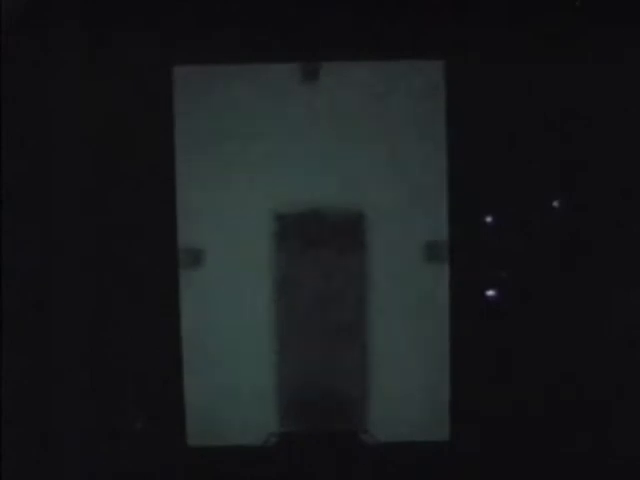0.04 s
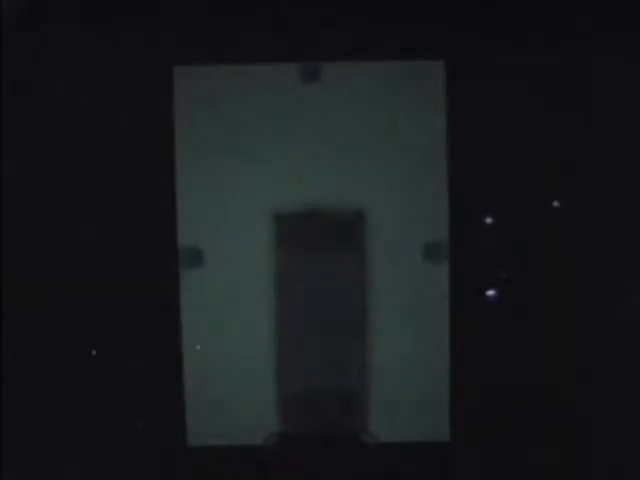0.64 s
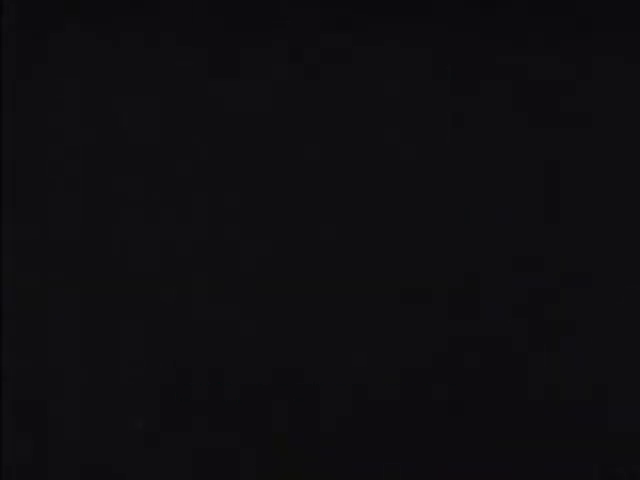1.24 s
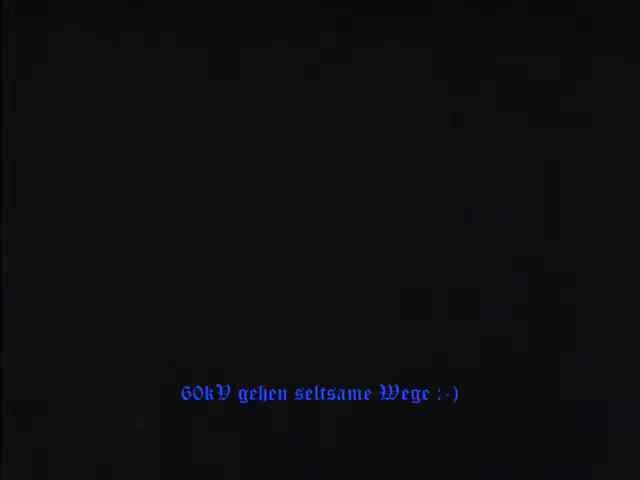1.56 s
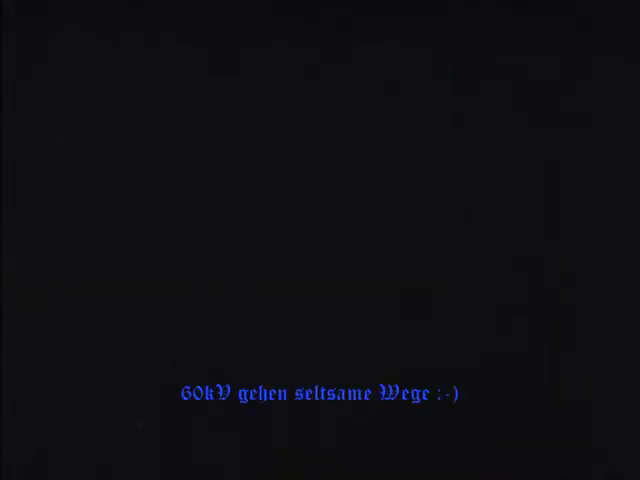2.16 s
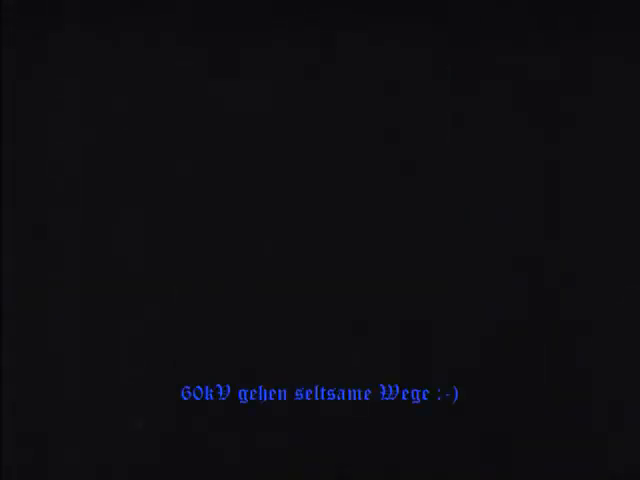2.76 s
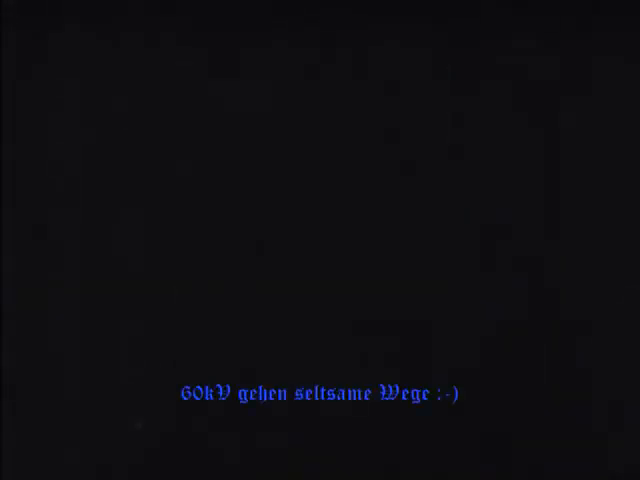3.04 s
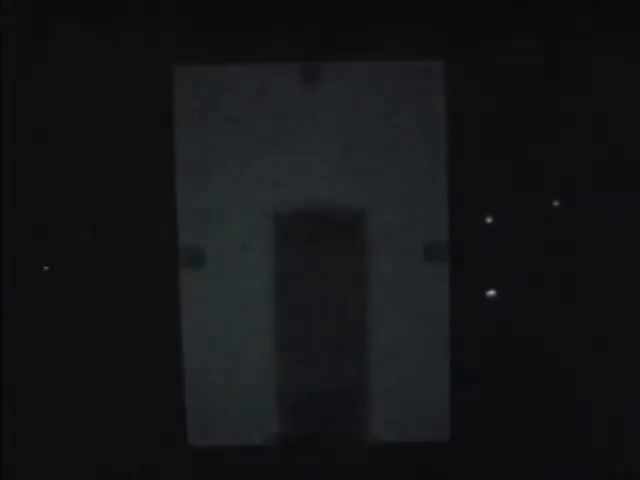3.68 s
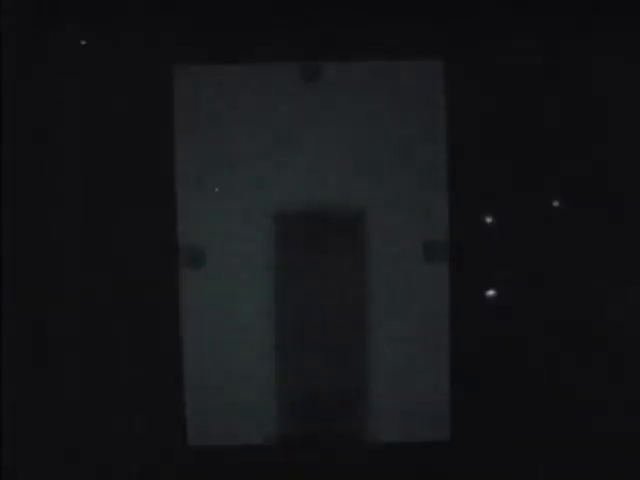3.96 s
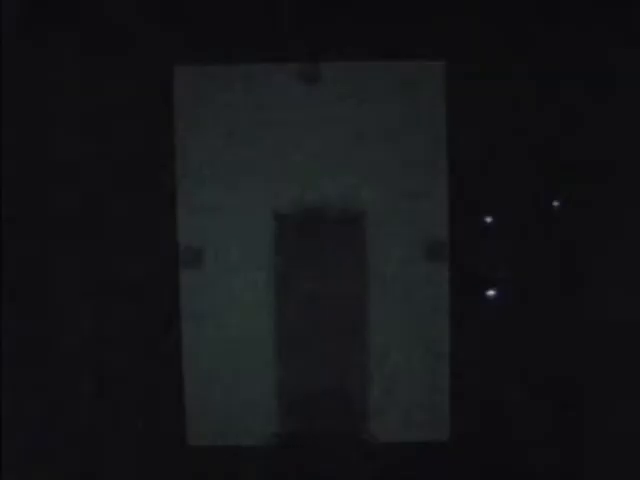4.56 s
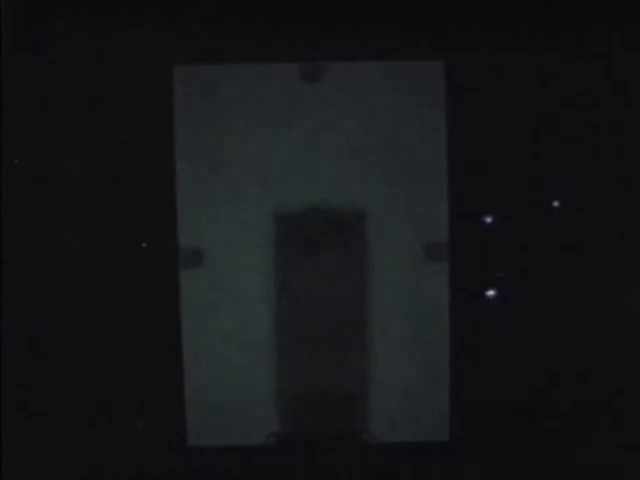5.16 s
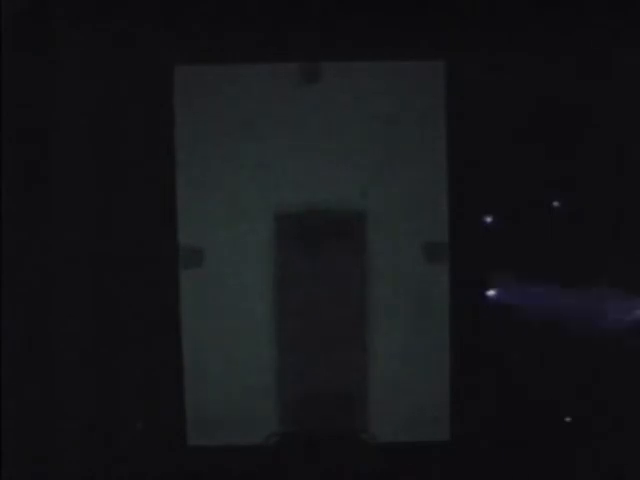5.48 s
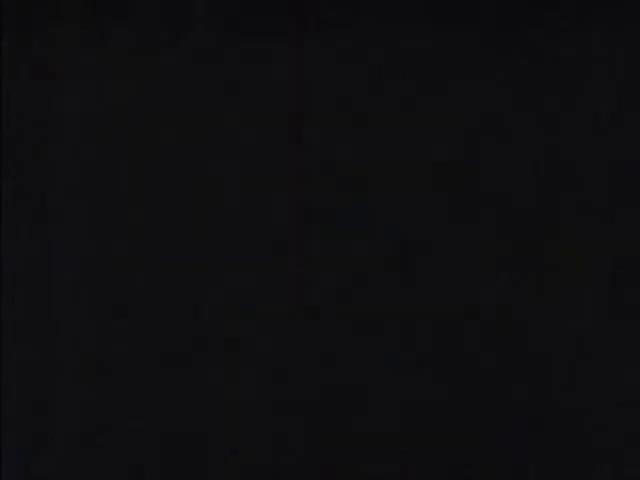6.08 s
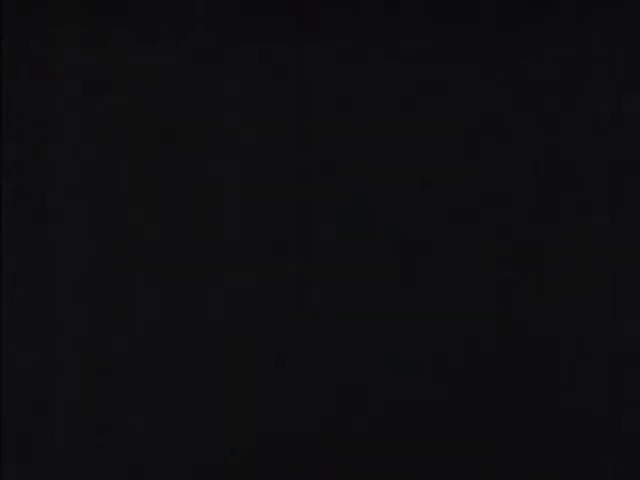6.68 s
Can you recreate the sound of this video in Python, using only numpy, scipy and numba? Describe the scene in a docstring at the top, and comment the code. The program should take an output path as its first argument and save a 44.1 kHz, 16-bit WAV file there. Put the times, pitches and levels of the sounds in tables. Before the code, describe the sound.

A frying electrical hiss and little spark snaps lead to a sharp discharge in a laboratory, over the throbbing hum and rapid ticking of vacuum pumps. The hiss dies away, leaving the machinery and a few faint squeaks. Then it resumes, with more sparks and two hard cracks that ring briefly in the room. Each big crack overloads the mono microphone and briefly pushes the background down.

```python
"""Corona hisses and small sparks snap at a high-voltage rig in a lab, over running vacuum pumps.
The pumps drone, clatter and rattle in a slow beat: shaft, strokes, housing and a ticking valve.
Three full flashovers crack and ring through the room, one early and two near the end.
A camcorder's mono microphone hears it all; its gain control ducks at each crack and creeps back up."""
import sys
import numpy as np
from scipy import signal
from scipy.fft import rfft, irfft
from scipy.io import wavfile
from scipy.ndimage import uniform_filter1d
from numba import njit

SR = 44100
rng = np.random.default_rng(int(sys.argv[2]) if len(sys.argv) > 2 else 0)


def log_audio(samples):
    """Write samples as a 16-bit WAV file to the path given in sys.argv[1]."""
    # one column per channel
    frames = np.atleast_2d(samples).T
    # limit to full scale, then quantise
    limited = np.clip(frames, -1, 1)
    pcm = np.round(limited * 32767).astype(np.int16)
    wavfile.write(sys.argv[1], SR, pcm)


N = 305172
T = np.arange(N) / SR
STROKE_HZ, BEAT_HZ = 50.3, 2.5  # the pumps' strokes and their slow beat
DRONE_PEAK_S, RATTLE_PEAK_S = 2.8394, 2.675


def undb(db):
    """Decibels to gain."""
    return 10 ** (np.asarray(db) / 20)


def level(x, db):
    """Scale to an rms level."""
    return x * undb(db) / np.sqrt(np.mean(x ** 2))


def colour(x, points, size=4096):
    """Minimum-phase filter through points of frequency_hz, gain_db."""
    hz, db = np.transpose(points)
    bins = np.maximum(np.fft.rfftfreq(size, 1 / SR), 1)
    gain = undb(np.interp(np.log(bins), np.log(hz), db))
    cepstrum = irfft(np.log(gain))
    cepstrum[1:size // 2] *= 2
    cepstrum[size // 2 + 1:] = 0
    return signal.fftconvolve(x, irfft(np.exp(rfft(cepstrum))))[:N]


def band(x, lo_hz, hi_hz, order=2):
    """Band-pass between two edges."""
    return signal.sosfilt(signal.butter(order, [lo_hz, hi_hz], "bandpass", fs=SR, output="sos"), x)


@njit
def sweep(x, hz, width):
    """One resonance whose centre moves, gain 1 at the centre."""
    out, band_state, low_state = np.empty(len(x)), 0., 0.
    for i in range(len(x)):
        tuning, damping = np.tan(np.pi * hz[i] / SR), width / hz[i]
        passed = (band_state + tuning * (x[i] - low_state)) / (1 + tuning * (tuning + damping))
        band_state = 2 * passed - band_state
        low_state += 2 * tuning * passed
        out[i] = damping * passed
    return out


def noise(repeat_hz=None):
    """White noise, fresh or coming round again at a rate."""
    x = rng.standard_normal(N)
    return x if repeat_hz is None else x[np.round(T % (1 / repeat_hz) * SR).astype(int)]


def ringing(hz, width_hz, db):
    """A steady ring: noise passed twice through one resonance, at an rms level."""
    peak = signal.iirpeak(hz, hz / width_hz, SR)
    return level(signal.lfilter(*peak, signal.lfilter(*peak, noise())), db)


def walk(rate_hz):
    """Smooth random drift with a spread near 1."""
    step = int(SR / rate_hz)
    held = np.repeat(rng.standard_normal(N // step + 1), step)
    return level(uniform_filter1d(uniform_filter1d(held, step), step)[:N], 0)


def fade(start, t60):
    """Envelope that jumps to 1 and dies away."""
    return (T >= start) * np.exp(-np.log(1000) * np.clip((T - start) / t60, 0, 10))


def beat(peak_s):
    """The pumps' slow beat, swinging between -1 and 1."""
    return np.cos(2 * np.pi * BEAT_HZ * (T - peak_s))


def knocks(per_s, sharpness):
    """Gate that jumps open at each knock and falls away until the next."""
    return np.exp(-sharpness * (T * per_s % 1))


def lab_air():
    """Room tone: the steady air of the lab around the microphone."""
    # colour of the air: frequency_hz, gain_db
    air = [(20, -39), (70, -47), (150, -32), (300, -25), (500, -13), (950, -16), (1800, -19), (2400, -20),
           (5200, -30), (8000, -32.5), (14500, -48.5)]
    return level(colour(noise(), air), db=-45.5)


def squeaks(flutter=0.36, flutter_hz=24.36, width_hz=150):
    """A dry spot in the pump sings briefly, pulsing as the shaft turns."""
    # faint squeaks: peak_s, pitch_hz, half_length_s, level_db
    chirps = [(1.68, 5180, .08, -54), (2.09, 5170, .05, -55.5), (2.105, 6170, 0.0085, -54),
              (2.422, 10200, .03, -64), (2.45, 5210, 0.097, -57), (3.305, 6180, 0.0085, -51),
              (3.405, 5240, 0.026, -47), (6.85, 5250, .05, -56)]
    song = sum(ringing(hz, width_hz, db) * np.exp(-((T - peak_s) / half_s) ** 2)
               for peak_s, hz, half_s, db in chirps)
    return song * (1 + flutter * np.cos(2 * np.pi * flutter_hz * (T - DRONE_PEAK_S)))


def drone(gain_db=2.4, waver_db=0.16):
    """Neighbouring shaft tones flutter against each other and swell twice a beat."""
    # throbbing tones, spaced by the shaft rate: pitch_hz, relative_db
    shaft_tones = [(400.1, -44), (424.46, -45)]
    # steady tones beside them: pitch_hz, relative_db
    side_tones = [(390.1, -58), (438.84, -58), (448.85, -52), (453.86, -57)]
    # two rows for the long swell, two for the short: peak_s, half_length_s, relative_db
    throbs = [(2.779, 0.043, -4.5), (2.871, 0.059, -0.5), (3.014, 0.041, 0), (3.076, 0.026, -6)]

    def tones(table, lead_s=0):
        return sum(undb(db) * np.cos(2 * np.pi * hz * (T + lead_s - DRONE_PEAK_S)) for hz, db in table)

    swells = []
    for peak_s, half_s, db in throbs:
        from_peak_s = (((T - peak_s) * BEAT_HZ + .5) % 1 - .5) / BEAT_HZ
        swells.append(undb(db) * np.exp(-(from_peak_s / half_s) ** 2))
    long_throb = sum(swells[:2]) * tones(shaft_tones)
    short_throb = sum(swells[2:]) * tones(shaft_tones, lead_s=.00145)
    return (2 * (long_throb + short_throb) + tones(side_tones)) * undb(gain_db + waver_db * walk(9))


def chamber(opens_s=2.555, start_hz=1830, end_hz=815, sink_s=.14):
    """The pump chamber opens once a beat; its resonance sinks as it grows. Gives Hz and opening (0-1)."""
    age = (T - opens_s) % (1 / BEAT_HZ)
    hz = end_hz + (start_hz - end_hz) * np.exp(-age / sink_s)
    return hz, np.sin(np.pi * (age * BEAT_HZ) ** 0.54)


def hum(waver_db=3.0, drift_cycles=0.16, rest=0.68, reach_hz=170):
    """Mains hum, ringing metal, and a whine whose tones flare as the chamber's resonance passes."""
    # mains and motor hum: pitch_hz, level_db
    mains = [(75.4, -77), (100, -68), (150.5, -74.5), (199.5, -68.5), (247.6, -65), (300.5, -62.5)]
    # whine of the pump strokes: pitch_hz, level_db
    whine = [(522, -57), (655, -52.5), (754, -55), (855, -54), (954, -51), (1005, -51), (1106, -54),
             (1156, -50), (1408, -56), (1500, -49.5), (1612, -53), (1693, -58), (1756, -55)]
    # narrow rings of the pump's metal parts: pitch_hz, width_hz, level_db
    metal_rings = [(749, 29, -57), (872, 76, -50.5), (962.6, 80, -50), (1337, 55, -51.5), (1513, 49, -58),
                   (1837, 40, -52), (4186, 220, -58.5), (5210, 90, -66), (8950, 36, -77)]
    out = sum(level(np.sin(2 * np.pi * (hz * T + rng.random())), db) for hz, db in mains)
    chamber_hz, opening = chamber()
    for hz, db in whine:
        flare = opening / (1 + ((hz - chamber_hz) / reach_hz) ** 2)
        strength = (rest + flare) * undb(waver_db * walk(12))
        out += level(strength * np.sin(2 * np.pi * (hz * T + drift_cycles * walk(11))), db)
    return out + sum(ringing(hz, width, db) for hz, width, db in metal_rings)


def turning(wobble_rad=0.71):
    """Broadband pattern that comes round with each shaft turn (two strokes) and slowly changes shape."""
    size = int(2 * SR / STROKE_HZ)
    place = (T * STROKE_HZ / 2 % 1 * size).astype(int)
    spectra = (np.exp(2j * np.pi * rng.random(size // 2 + 1)) for _ in range(2))
    first, second = (level(irfft(spectrum, size), 0)[place] for spectrum in spectra)
    angle = wobble_rad * walk(8)
    return first * np.cos(angle) + second * np.sin(angle)


def clatter(body_db=-39.5, swell_db=1.1, churn_db=-44, churn_width_hz=640., wander=.03):
    """Two and three knocks a stroke shake the housing and churn in the chamber, repeating as a buzz."""
    # colour of the pump housing: frequency_hz, gain_db
    housing = [(120, -47), (200, -30.5), (280, -19.5), (370, -10.5), (460, -6), (550, -9), (660, -6.5),
               (800, -8.5), (960, -2), (1190, -11.5), (1450, -7.5), (1680, -14), (1850, -16), (2400, -34)]
    top_hz = 1875
    gate = knocks(3 * STROKE_HZ, sharpness=1.8) + .8 * knocks(2 * STROKE_HZ, sharpness=2.2)
    shake, gulp = (gate * (turning() + .4 * noise(BEAT_HZ) + .15 * noise()) for _ in range(2))
    body = band(colour(shake, housing), 116.6, top_hz, order=16)
    chamber_hz, opening = chamber()
    centre_hz = chamber_hz * (1 + wander * walk(4))
    churn = sweep(sweep(gulp * opening, centre_hz, churn_width_hz), centre_hz, churn_width_hz)
    churn = band(churn, 490, top_hz, order=12)
    return level(body, body_db) * undb(swell_db * beat(RATTLE_PEAK_S)) + level(churn, churn_db)


def valve_rattle(tick_hz=51.2, ring_db=-46, scrape_db=-56, scatter_db=1.2, buzz_db=-4):
    """A valve ticks rapidly; its resonances swell and bend one after another through each beat."""
    # valve resonances, loudest and highest at their lag in the beat:
    # pitch_hz, base_width_hz, relative_db, lag_s, bend_fraction
    valve_modes = [(2080, 137, 5.5, -0.087, 0), (2793, 200, 1.5, -0.032, 0), (3043, 140, 2.5, 0.0076, 0),
                   (3300, 83, 0, -0.17, 0.0099), (3490, 59, 4.5, 0.046, 0.026),
                   (3940, 320, 4.5, 0.028, 0.018), (4270, 270, 7.5, 0.0091, 0.0086),
                   (5177, 120, 2.5, 0.0015, 0.0046), (5360, 89, -1, -0.037, 0.0062),
                   (5710, 81, 0, 0.0009, 0.0078), (6690, 510, -2.5, -0.0037, 0.023),
                   (7660, 140, -0.5, 0.013, 0.005), (7870, 180, -2, -0.024, 0.036)]
    # colour of the valve's scrape: frequency_hz, gain_db
    scrape_colour = [(1180, -35.5), (2000, 0.5), (2310, 11.5), (4300, 3), (6160, -51), (7950, -12),
                     (12000, -10.5), (15600, -99), (22000, -120)]

    def looseness(swing, rest=0.29, edge=2.0):
        return rest + (1 + np.tanh(edge * swing)) / 2

    ticks = uniform_filter1d(knocks(tick_hz, sharpness=2.1), 50)
    force = ticks * undb(scatter_db * walk(45)) * (noise() + undb(buzz_db) * noise(tick_hz))
    ring = np.zeros(N)
    for hz, base_width, db, lag_s, bend in valve_modes:
        swing = beat(RATTLE_PEAK_S + lag_s)
        centre, width = hz * (1 + bend * swing), 1.3 * base_width
        ring += undb(db) * sweep(sweep(force * looseness(swing), centre, width), centre, width)
    scrape = colour(force * looseness(beat(RATTLE_PEAK_S)), scrape_colour)
    return level(ring, ring_db) + level(scrape, scrape_db)


def corona(grain_db=1.0, growth_db_per_s=1, attack_s=0.011):
    """Tiny discharges merge into a frying hiss that grows with the voltage and dies as charge drains."""
    # spells while the electrode is charged: start_s, end_s, start_level_db, drain_t60_s
    spells = [(0, 1.08, -42.5, 0.6), (3.586, 3.9, -45.5, 0.05), (3.907, 5.95, -43, 2.4)]
    # colour of the corona: frequency_hz, gain_db
    hiss_colour = [(1060, -33), (1800, -0.5), (1960, -5.5), (2200, 0), (2480, -4), (3000, -7.5), (3350, -8),
                   (4320, -6.5), (5780, -7.5), (7550, -6.5), (10000, -15.5), (14000, -31)]
    strength = np.zeros(N)
    for start, end, db, drain_t60 in spells:
        charging_s = np.clip(T - start, 0, end - start)
        lit = np.clip(charging_s / attack_s, 0, 1) * ((T < end) + fade(end, drain_t60))
        strength += lit * undb(db + growth_db_per_s * charging_s)
    frying = noise() * undb(grain_db * walk(980))
    hiss = level(colour(frying, hiss_colour), 0)
    electrode_song = ringing(hz=2275, width_hz=90, db=-11)
    return (hiss + electrode_song) * strength


def snap(start, pitch_hz, low_db=0, pulse_db=-2, pulse_s=0.00067, crooked=0.088, spread_s=0.0021):
    """A hollow knock: a pressure pulse, lower for a longer channel, and the ring of the rig around it."""
    # ring of the rig: pitch_hz, relative_db, t60_s
    rig_modes = [(190, -26, 0.066), (281, -18.5, 0.096), (450, -22.5, 0.028), (640, -14.5, 0.025),
                 (1205, -14, 0.074), (1360, -13.5, .022), (1540, -30, 0.093), (2900, -8, 0.013)]
    low_modes_below_hz = 350
    age = T[:int(SR / 10)]
    push = crooked * rng.standard_normal(len(age)) * np.exp(-age / spread_s)
    push[0] = 1
    pulse_shape = age / pulse_s * np.exp(1 - age / pulse_s)
    pulse = undb(pulse_db) * pulse_shape * np.sin(2 * np.pi * pitch_hz * age)
    ring = np.zeros(len(age))
    for hz, db, t60 in rig_modes:
        gain = undb(db + low_db * (hz < low_modes_below_hz))
        ring += gain * np.exp(-np.log(1000) * age / t60) * np.sin(2 * np.pi * hz * age)
    knock = band(signal.fftconvolve(push, pulse + ring), 188, 2900, order=4)
    return -np.pad(knock, (int(start * SR), N))[:N]


def cracks(crack_t60=0.049, room_db=-13, room_t60=0.21, thump_t60=0.011, build_s=0.0097):
    """Sparks and one pump knock snap briefly; a flashover fills the room and overloads the microphone."""
    # small sparks, and a last faint knock as the pump's clatter starts up:
    # start_s, crack_db, snap_db, snap_hz, low_mode_gain_db
    small_snaps = [(0.003, -23, -35, 900, 0), (0.058, -31.5, -41, 900, 2), (0.160, -30.5, -37, 890, -3),
                   (0.238, -35, -27, 900, 0), (0.35, -29.5, -22, 910, -1), (0.4342, -36, -26, 895, -1),
                   (0.9282, -32.5, -15, 990, 1), (1.1042, -38, -31, 900, 0), (3.9025, -26.5, -9, 940, -1.5),
                   (4.201, -33, -25.5, 1300, 5), (4.2217, -27.5, -12.5, 985, 1),
                   (4.4519, -36.5, -22, 750, -11), (4.6113, -28, -21.5, 724, 11),
                   (5.481, -28.5, -13.5, 1010, 0.5), (5.6482, -29, -14.5, 1010, -5),
                   (5.7504, -35.5, -28.5, 700, 0), (5.8124, -34.5, -26.5, 850, 5.5),
                   (6.594, -50, -26, 950, -4)]
    # full flashovers: start_s, blast_db, snap_db, snap_hz, overload_drive_db, thump_db, thump_hz
    flashovers = [(0.5192, -6.5, -7, 900, 14, -5.5, 232), (4.6783, -6.5, -10, 567, 14.5, -8.5, 199),
                  (5.9480, -5.5, -10.5, 930, 14, -21, 162)]
    # colour of the cracks: frequency_hz, gain_db
    crack_colour = [(130, -43), (220, -23), (310, -17), (423, -13), (461, -21), (548, -12.5), (843, -15),
                    (968, -14), (1320, -8.5), (2330, -11), (3070, -10), (3460, -10.5), (7140, -8.5),
                    (9570, -17), (13500, -35)]
    bursts, knock = np.zeros(N), np.zeros(N)
    air = noise()
    for start, crack_db, snap_db, snap_hz, low_db in small_snaps:
        room_tail = undb(room_db) * fade(start, room_t60 / 2)
        bursts += undb(crack_db) * air * (fade(start, crack_t60) + room_tail)
        knock += undb(snap_db) * snap(start, snap_hz, low_db)
    for start, blast_db, snap_db, snap_hz, drive_db, thump_db, thump_hz in flashovers:
        # reflections pile up within milliseconds; the overload flattens the first part of their decay
        build = np.clip((T - start) / build_s, 0, 1)
        bursts += undb(blast_db) * build * np.tanh(undb(drive_db) * air * fade(start, room_t60))
        # the heated channel pushes out a low thump
        thump = fade(start, thump_t60) * np.cos(2 * np.pi * thump_hz * (T - start))
        knock += undb(snap_db) * snap(start, snap_hz) - undb(thump_db) * band(thump, 99, 1900)
    return colour(bursts, crack_colour) / np.std(colour(air, crack_colour)) + knock


@njit
def ducking(over_db, attack_s, release_s, start_db):
    """Gain cut in dB: starts at start_db, jumps up to any excess of level and leaks away slowly."""
    cut, out = start_db, np.empty(len(over_db))
    for i in range(len(over_db)):
        if over_db[i] > cut:
            cut += (over_db[i] - cut) / (1 + attack_s * SR)
        cut -= cut / (release_s * SR)
        out[i] = cut
    return out


def scene():
    """Running pumps, lab air, corona and cracks at one microphone, the same in both channels."""
    pumps = drone() + hum() + clatter() + valve_rattle() + squeaks()
    mono = pumps + lab_air() + corona() + cracks()
    return np.array([mono, mono])


def record(dry):
    """The camcorder: gain control, soft clipping, a soft top, its own noise and whistle, a steep cut."""
    threshold_db, ceiling = -22.8, .23
    whistle_hz, top_hz = 15625, 15900
    over_db = 20 * np.log10(np.abs(dry[0]) + 1e-9) - threshold_db
    cut_db = ducking(over_db, attack_s=0.0013, release_s=0.71, start_db=16.5)
    clipped = ceiling * np.tanh(dry * undb(-cut_db) / ceiling)
    softened = band(clipped, 20, 10800, order=4)
    # self-noise enters after the gain control and never ducks: frequency_hz, gain_db
    noise_colour = [(30, -6.5), (80, 4.0), (300, -2.5), (3000, -10), (14000, -20.0)]
    own_noise = level(colour(noise(), noise_colour), db=-66.0)
    line_whistle = level(np.sin(2 * np.pi * whistle_hz * T), db=-76.0)
    steep_cut = signal.ellip(10, .2, 70, top_hz, fs=SR, output="sos")
    return signal.sosfilt(steep_cut, softened + own_noise + line_whistle)


dry = scene()
out = record(dry)
log_audio(out)
```